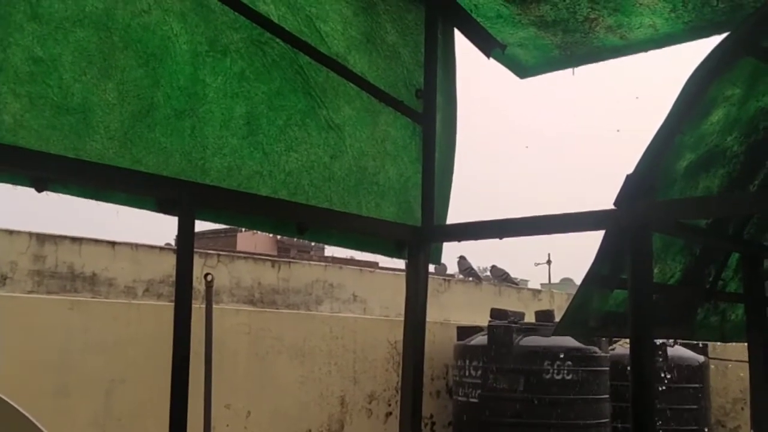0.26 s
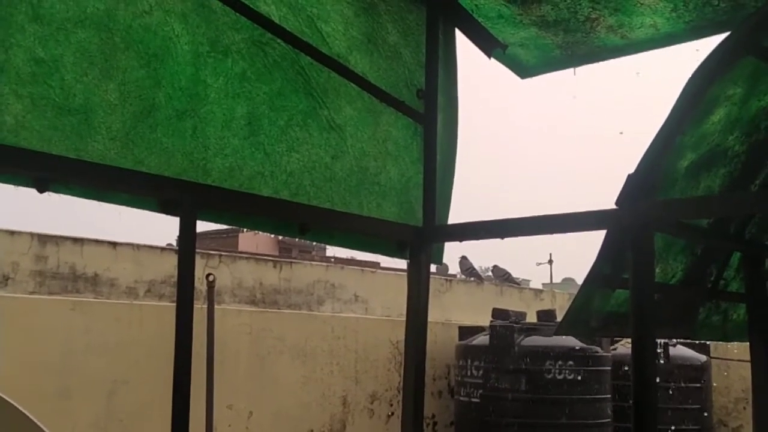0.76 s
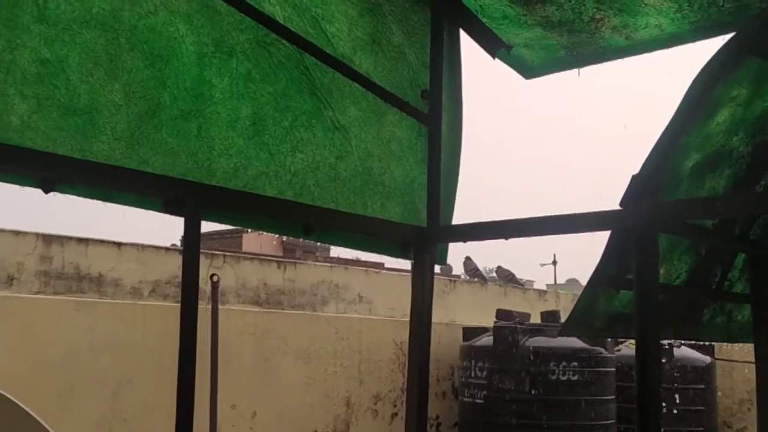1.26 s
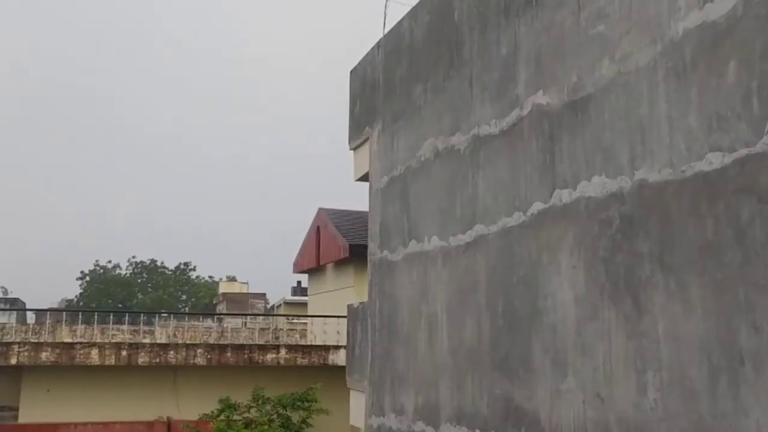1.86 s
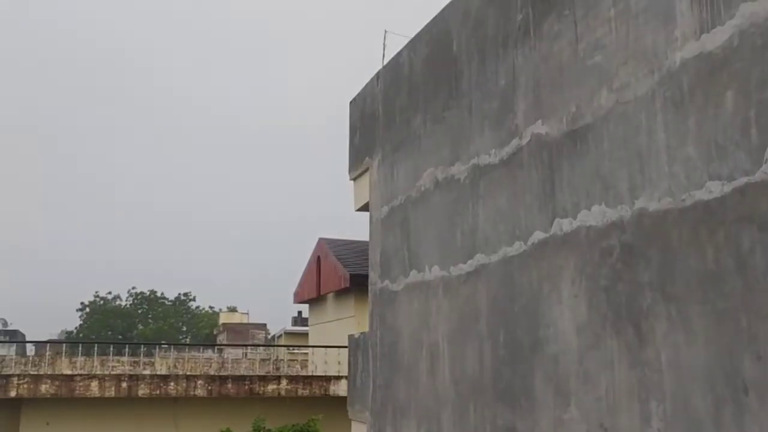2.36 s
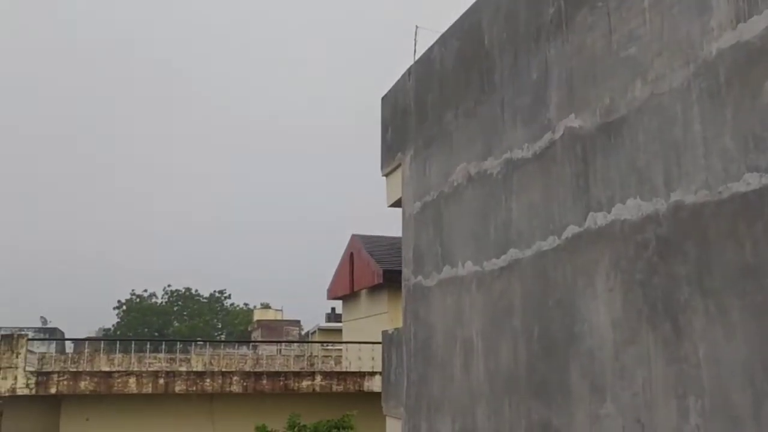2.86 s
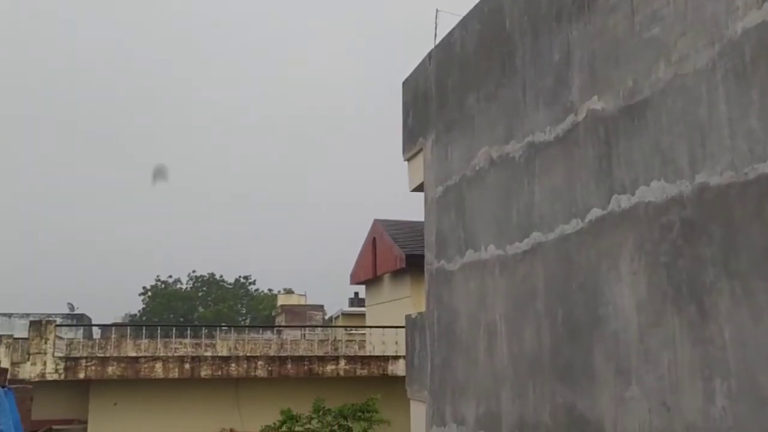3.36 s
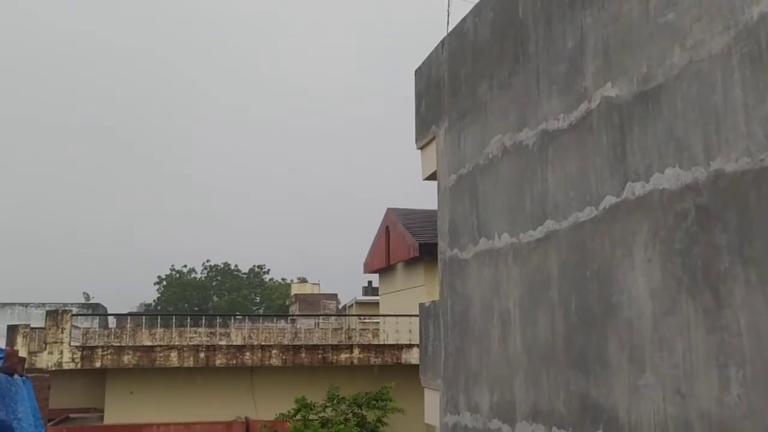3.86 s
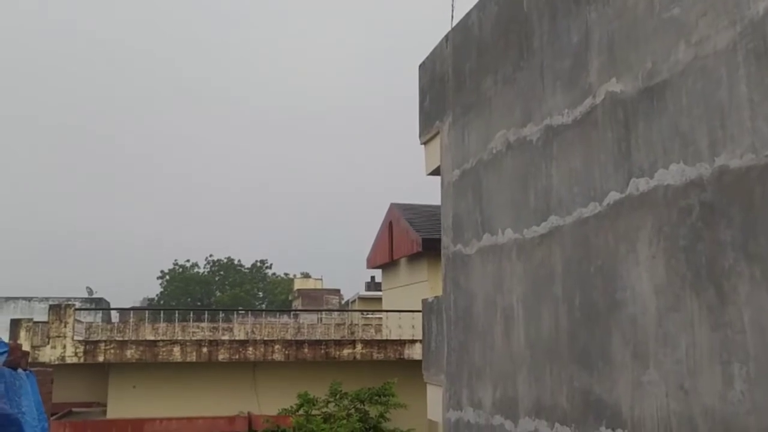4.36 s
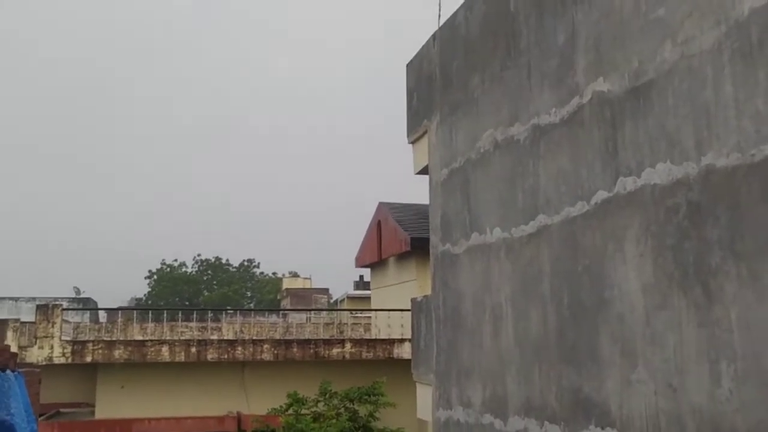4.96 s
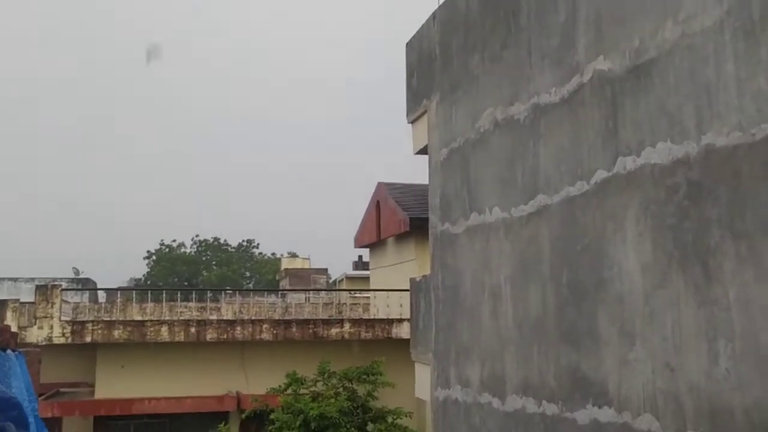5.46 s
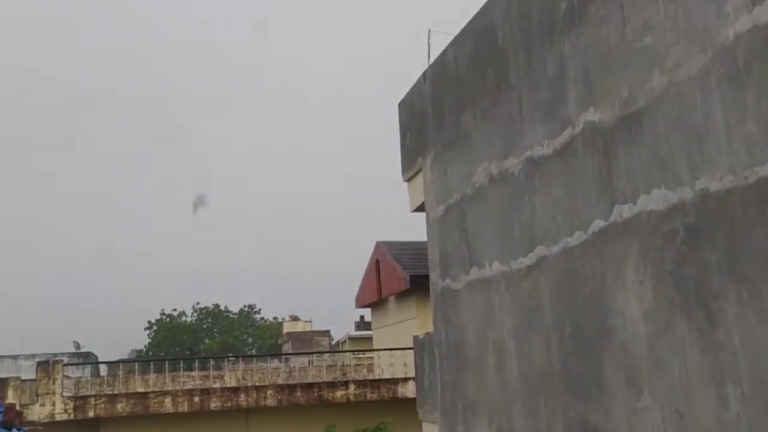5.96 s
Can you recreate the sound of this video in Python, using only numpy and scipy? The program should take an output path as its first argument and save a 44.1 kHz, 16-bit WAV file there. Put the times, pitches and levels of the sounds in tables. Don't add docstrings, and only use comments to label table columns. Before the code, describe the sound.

Even rainfall wash and pattering drips on a rooftop, a brief dropout, more rain, a distant pigeon-like coo, and finger noises on the phone.

```python
import sys
import numpy as np
from scipy import signal
from scipy.fft import rfft, irfft
from scipy.io import wavfile
from scipy.ndimage import uniform_filter1d

SR = 44100
rng = np.random.default_rng(int(sys.argv[2]) if len(sys.argv) > 2 else 0)


def persist_wave(psi):
    counts = np.round(np.clip(psi, -1, 1) * 32767).astype(np.int16)
    wavfile.write(sys.argv[1], SR, np.atleast_2d(counts).T)


def nominal_scale(level):
    x = np.asarray(level, float) / 20
    return 10 ** x


N = 274302
TIME = np.arange(N) / SR


def at_hz(points, hz):
    table = np.array(points)
    return np.interp(np.log(hz + 1), np.log(table[:, 0]), table[:, 1])


def in_time(rows):
    s, *columns = np.transpose(rows)
    return [np.interp(TIME, s, column) for column in columns]


def band(x, low_hz, high_hz):
    sos = signal.butter(2, [low_hz, min(high_hz, .45 * SR)], "band", fs=SR, output="sos")
    return signal.sosfilt(sos, x)


def drift(rate):
    decimation, warm_up = 40, 2000
    pole = np.exp(-2 * decimation * np.pi * rate / SR)
    noise = rng.standard_normal(N // decimation + warm_up + 2)
    slow = signal.lfilter([1], [1, -2 * pole, pole * pole], noise)[warm_up:]
    return np.interp(np.arange(N) / decimation, np.arange(len(slow)), slow / slow.std())


def patter(per_s, spread_db):
    sizes_db = spread_db * np.minimum(rng.exponential(1, (2, N)), 5)
    sizes = nominal_scale(sizes_db) * rng.choice([-1, 1], (2, N))
    clicks = sizes * (rng.random((2, N)) < per_s / SR)
    return clicks / clicks.std()


def rain():
    # t/s, level/dB
    swell = [(0, 1.5), (.12, -.5), (.3, 1), (.6, 0), (.96, 1), (1.33, -0.5), (1.82, 0.3), (2.5, 0),
             (3.2, 0), (3.6, -0.33), (4.07, -1), (4.3, 0.7), (4.75, -0.7), (5.15, 0.7), (5.4, 0.6),
             (5.7, 1), (5.9, 0), (6.22, 1.5)]
    # t/s, level/dB
    left_shade = [(2.9, 0), (4.07, -1), (4.3, -0.5), (4.85, -1), (4.95, -3), (5.07, -1.5), (5.7, -1.5),
                  (5.95, -3.5), (6.22, -4)]
    # f/Hz, correlation/1
    likeness = [(60, 0.57), (150, 0.86), (380, 0.83), (950, 0.26), (2380, -0.22), (5980, 0.37),
                (15000, -0.01)]
    split_hz, gust_db, gusts_per_s = 3420, .6, 3.0
    spray_follows = 1.3
    (swell_db,), (shade_db,) = in_time(swell), in_time(left_shade)

    def port_levels(share):
        gusts = np.array([drift(gusts_per_s), drift(gusts_per_s)])
        return share * swell_db + shade_db * [[1], [0]] + gust_db * gusts

    roar_db, spray_db = port_levels(1), port_levels(spray_follows)
    mid, side = rfft(rng.standard_normal((2, N)))
    alike = np.clip(at_hz(likeness, np.fft.rfftfreq(N, 1 / SR)), -1, 1)
    common, opposed = np.sqrt(1 + alike) * mid, np.sqrt(1 - alike) * side
    wash = irfft((common + opposed * [[1], [-1]]) / np.sqrt(2), N)
    grain = .35
    drops = np.sqrt(1 - grain) * rng.standard_normal((2, N))
    drops += np.sqrt(grain) * patter(per_s=3000, spread_db=-0.5)
    flutter_db = 0.77 * drift(27) + .5 * np.array([drift(25), drift(25)])
    low = signal.butter(4, split_hz, "low", fs=SR, output="sos")
    high = signal.butter(4, split_hz, "high", fs=SR, output="sos")
    roar = nominal_scale(roar_db + 0.56 * drift(7.0)) * signal.sosfilt(low, wash)
    spray = nominal_scale(spray_db + flutter_db) * signal.sosfilt(high, drops)
    return roar + spray


def causal(spectrum, hollows):
    size = 4096
    hz = np.fft.rfftfreq(size, 1 / SR)
    peaks_db = sum(db / (1 + (2 * (hz - centre) / width) ** 2) for centre, width, db in hollows)
    cepstrum = irfft(np.log(nominal_scale(at_hz(spectrum, hz) + peaks_db) * np.sqrt(SR / 2)))
    cepstrum[1:size // 2] *= 2
    return irfft(np.exp(rfft(cepstrum[:size // 2], size)))


def through_port(x, colours, cups, grip_rows):
    # f/Hz, width/Hz, level/dB
    shared_modes = [
        (272, 31, 1.5),
        (867, 210, 3),
        (13650, 2400, 3),
    ]
    grip, = in_time(grip_rows)
    out = np.zeros(N)
    for k, (colour, cup) in enumerate(zip(colours, cups)):
        share = np.clip(1 - abs(grip - k), 0, 1)
        out += share * signal.fftconvolve(x, causal(colour, shared_modes + cup))[:N]
    return out


def left_port(x):
    # f/Hz, level/dB per Hz
    colours = [
        [(40, -89.5), (110, -81.5), (170, -74.5), (300, -72), (800, -72), (1500, -75), (3000, -77),
         (4000, -79.5), (4700, -77.5), (6000, -74), (8000, -74.5), (9200, -74.5), (10500, -84), (15500, -108.3)],
        [(40, -82), (110, -83), (170, -71), (300, -72.5), (800, -73.5), (1500, -75), (3000, -75), (4000, -78),
         (4700, -76.5), (6000, -72), (7300, -79), (9200, -78.5), (10500, -89), (15500, -106.9)],
        [(40, -86), (110, -80.5), (170, -72), (300, -71.5), (800, -72), (1500, -75.5), (3000, -76.5),
         (4000, -78), (4700, -84), (6000, -82), (8000, -77.5), (9200, -90), (10500, -94.5), (15500, -111.9)],
        [(40, -86.5), (110, -77), (170, -72.5), (300, -70.5), (800, -72.5), (1500, -74), (3000, -76.5),
         (4000, -76.5), (4700, -79.5), (6000, -75), (8000, -72.5), (9200, -74.8), (10500, -82), (15500, -105.4)],
    ]
    # t/s, grip number
    grips = [(1.0, 0), (1.12, 1), (1.5, 1), (1.6, 2), (4.55, 2), (4.75, 3)]
    return through_port(x, colours, [[]] * len(colours), grips)


def right_port(x):
    # f/Hz, level/dB per Hz
    colours = [
        [(40, -75.5), (110, -79), (170, -63.5), (300, -65), (900, -66.5), (1400, -68.5), (2300, -65.5),
         (3800, -78.5), (5500, -75.5), (6900, -80.5), (7600, -81.5), (9300, -74.5), (11500, -86),
         (15500, -110.6)],
        [(40, -75.5), (110, -80), (170, -65.5), (300, -64), (600, -66.5), (1300, -68), (2300, -66), (3800, -78),
         (5500, -76.5), (6900, -74), (7900, -78), (9300, -72), (11500, -84.5), (15500, -106.3)],
        [(40, -71.5), (110, -77.5), (170, -63.5), (300, -64.5), (600, -67.5), (1300, -68.5), (2300, -69.5),
         (3800, -78), (5500, -77), (6900, -77), (7900, -76), (9300, -73), (11500, -90), (15500, -107.7)],
        [(40, -73), (110, -84), (170, -66.5), (300, -66), (900, -70.5), (1400, -71), (2300, -71), (3800, -81.5),
         (5500, -80.5), (6900, -81), (7600, -87.5), (9300, -77.5), (11500, -89), (15500, -105.0)],
    ]
    # f/Hz, width/Hz, level/dB
    cups = [
        [],
        [(2370, 540, 7.5)],
        [(2625, 750, 9.5)],
        [],
    ]
    # t/s, grip number
    grips = [(1.5, 0), (1.6, 1), (5.55, 1), (5.78, 2), (5.85, 2), (6.0, 3)]
    return through_port(x, colours, cups, grips)


def splats():
    # t/s, left level/dB over the rain, right level/dB over the rain
    drips = [(.149, 3, 14), (.165, 8.5, 3), (.203, 11, 14), (.377, 2.5, 5.5), (.389, 6, 5.5),
             (.664, 6.5, 2), (.767, 2, 11), (.774, 11, 4.5), (.915, 8, 8), (1.953, -1, 6), (2.2, 1, 9),
             (2.66, 3, -2), (3.099, 5.5, 7), (3.204, 7, 7), (3.212, 11.5, 15), (3.224, 10, 1.5),
             (3.459, 3, 5.5), (3.528, 7, 6), (3.664, 2, 12), (3.677, 10, 3), (3.823, 6, 9),
             (4.129, 5, 11.5), (4.234, -1, 8.5), (4.288, 3, 9.5), (4.4, 5.5, 8.5), (4.72, -5, 7),
             (4.959, 10.5, 13.5), (5.201, 7.5, 8), (5.317, 5, 10)]
    left_hz, right_hz = 7400, 9180
    out, t = np.zeros((2, N)), np.arange(int(.15 * SR)) / SR
    for s, left_db, right_db in drips:
        spray_s = .008 + .0016 * max(left_db, right_db, 0)
        crack = np.exp(-t / 0.0013)
        droplets = nominal_scale(-8.5) * np.exp(-t / spray_s) * (1 - np.exp(-t / .002))
        hz = left_hz if left_db > right_db - 2 else right_hz
        burst = band(rng.standard_normal((2, len(t))) * (crack + droplets), hz * 0.73, hz * 1.35)
        i = int((s - .001) * SR)
        out[:, i:i + len(t)] += nominal_scale([[left_db + 3.0], [right_db + 4.0]]) * burst
    return out


def rub():
    # t/s, pressure level/dB
    pressure = [(4.6, -75), (4.72, -40), (4.85, -40), (4.93, -32.5), (4.98, -29), (5.0, -31.5),
                (5.025, -46), (5.05, -32), (5.1, -58)]
    rumble_db, = in_time(pressure)
    hiss_db = -39 + 2.5 * (rumble_db + 31.5)
    rumble = band(rng.standard_normal(N), 150, 1480)
    hiss = band(rng.standard_normal(N), 4500, 10000)
    lumps_db = 2.8 * drift(90)
    sound = nominal_scale(rumble_db + lumps_db) * rumble / rumble.std()
    sound += nominal_scale(hiss_db + lumps_db) * hiss / hiss.std()
    return sound * nominal_scale([[0], [-18.0]])


def coo():
    # t/s, length/s, peak level/dB
    calls = [
        (4.641, .36, -42),
        (5.05, 0.35, -43),
    ]
    start_hz, sag_hz_per_s = 459, 105
    hz = start_hz - sag_hz_per_s * np.clip(TIME - calls[0][0], 0, 1)
    tone = np.sin(2 * np.pi * np.cumsum(hz * (1 + .015 * drift(26))) / SR)
    swell = sum(nominal_scale(db) * np.sin(np.pi * np.clip((TIME - s) / length, 0, 1)) for s, length, db in calls)
    return np.sqrt(2) * swell * nominal_scale(2.0 * drift(14)) * tone * nominal_scale([[-9.0], [0]])


def case_ring(t, hz):
    t = np.maximum(t, 0)
    return np.sin(2 * np.pi * hz * t) * np.exp(-t * hz / 1.2) * (1 - np.exp(-t / .0002))


def ticks(rows, thud_hz, knock_db):
    hard_db, knock_hz, knock_lag_s = -17.5, 410, .0017
    out, t = np.zeros(N), np.arange(int(.02 * SR)) / SR
    for s, db, hz, thud_db in rows:
        slips = (t == 0) + .4 * rng.standard_normal(len(t)) * np.exp(-t / .0004)
        snap = band(slips, hz * .5, hz * 1.55)
        thud = case_ring(t, thud_hz)
        if thud_db > hard_db:
            thud += nominal_scale(knock_db) * case_ring(t - knock_lag_s, knock_hz)
        i = int((s - .0002) * SR)
        out[i:i + len(t)] += nominal_scale(db) * snap / abs(snap).max() + nominal_scale(thud_db) * thud
    return out


def left_ticks():
    # t/s, peak level/dB, f/Hz, thud level/dB
    releases = [(4.895, -21, 3000, -18), (4.905, -28, 2500, -24), (4.909, -24, 3000, -22),
                (4.939, -22.5, 8000, -14.5), (4.948, -21, 7000, -22), (4.9543, -11, 8000, -15.5),
                (4.968, -24, 8040, -19), (4.978, -22, 8000, -18), (4.9927, -13, 6000, -16),
                (5.008, -20, 9000, -26), (5.015, -13, 11500, -30), (5.0167, -11, 10020, -40),
                (5.0177, -3, 10000, -30), (5.069, -24, 9000, -22), (5.163, -15, 10500, -30),
                (5.695, -22, 9000, -40), (5.7305, -18, 9020, -40), (5.7313, -7.5, 8500, -18)]
    return ticks(releases, thud_hz=1200, knock_db=1.5) * nominal_scale([[0], [-30]])


def right_ticks():
    # t/s, peak level/dB, f/Hz, thud level/dB
    releases = [
        (5.163, -20, 10500, -36),
        (5.695, -6, 7000, -5),
        (5.7297, -15, 5000, -22),
    ]
    return ticks(releases, thud_hz=2700, knock_db=-20) * nominal_scale([[-30], [0]])


def thinned(x):
    # f/Hz, level/dB
    margin = [(300, -22), (1200, -9.5), (2400, -6), (3500, -1.5), (4500, 0), (9000, -2), (11500, 2),
              (15000, 7.5)]
    # f/Hz, share of patches/1
    gaps = [(2600, 0), (3800, .17), (5500, .12), (7300, .12), (9000, .05), (11000, .3), (14000, .4)]
    hop, lead = 1024, 695
    n, count = np.arange(2 * hop), N // hop + 3
    window = np.sin(np.pi * (n + .5) / hop / 2)
    basis = window * np.cos(np.pi / hop * (n + .5 + hop / 2) * (n[:hop, None] + .5))
    blocks = np.pad(x, ((0, 0), (lead, count * hop - lead - N))).reshape(2, count, hop)
    lines = np.concatenate([blocks[:, :-1], blocks[:, 1:]], axis=2) @ basis.T
    hz = (n[:hop] + .5) * SR / hop / 2
    spread = uniform_filter1d(uniform_filter1d(lines ** 2, size=100), size=100)
    spread = uniform_filter1d(spread, size=3, axis=1)
    step = np.sqrt(abs(spread) + 1e-12) * nominal_scale(at_hz(margin, hz))
    uneven_db = 2.0 * rng.standard_normal((2, count - 1, 64))
    step = np.repeat(step[..., 8::16] * nominal_scale(uneven_db), 16, axis=2)
    rounded = np.sign(lines) * step * np.floor(abs(lines / step) ** .75 + .4054) ** (4 / 3)
    mottle = uniform_filter1d(rng.standard_normal(lines.shape[1:]), size=11)
    mottle = uniform_filter1d(mottle, size=4, axis=0)
    empty = at_hz(gaps, hz)
    rounded *= np.tanh(.85 * mottle / mottle.std()) / 2 + .5 > empty
    rounded /= np.sqrt(1 - empty)
    rounded *= hz < np.interp(rng.random((2, count - 1, 1)) ** 2.5, [0, 1], (14200, 15800))
    edges = uniform_filter1d(np.diff(blocks.reshape(2, -1), append=0) ** 2, size=24)
    sharp = (edges > 7 * uniform_filter1d(edges, size=2048)).reshape(blocks.shape).any(2)
    sudden = (sharp[:, :-1] | sharp[:, 1:])[..., None]
    frames = np.where(sudden, lines * (hz < 15810), rounded) @ basis * 2 / hop
    out = np.pad(frames[..., :hop], ((0, 0), (0, 1), (0, 0)))
    out += np.pad(frames[..., hop:], ((0, 0), (1, 0), (0, 0)))
    return out.reshape(2, -1)[:, lead:lead + N]


def scene():
    air = rain() + splats()
    ports = np.array([left_port(air[0]), right_port(air[1])])
    touches = band(rub() + left_ticks() + right_ticks(), 140, 11500)
    return ports + touches + coo()


def low_pass(x):
    return signal.sosfilt(signal.butter(12, 15810, fs=SR, output="sos"), x)


def record(dry):
    # level/dB, rise/s, fall/s
    settle = [
        (-35.5, .03, 0.19),
        (-41, 0.068, 0.19),
    ]
    stop_s, restart_s = 1.381, 1.766
    since = np.maximum(TIME - restart_s, 0)
    offset = [-nominal_scale(db) * (np.exp(-since / fall) - np.exp(-since / rise)) for db, rise, fall in settle]
    gate = np.clip(np.maximum((stop_s - TIME) / .003, since / 0.0046), 0, 1)
    mix = (thinned(dry) + np.array(offset)) * gate
    return low_pass(mix)


dry = scene()
out = record(dry)
persist_wave(out)
```